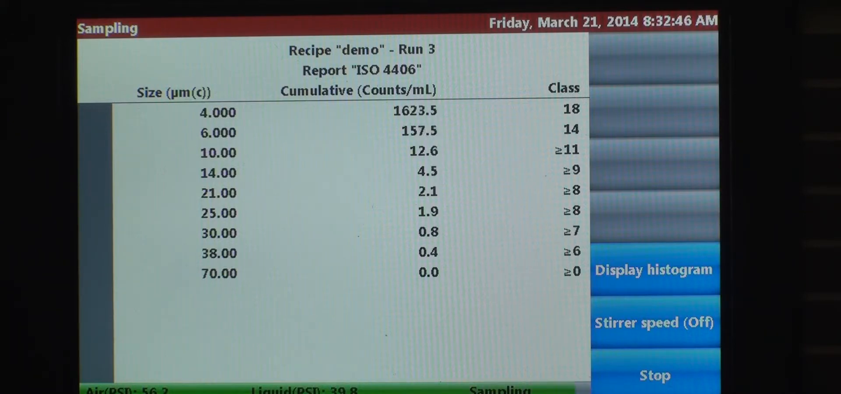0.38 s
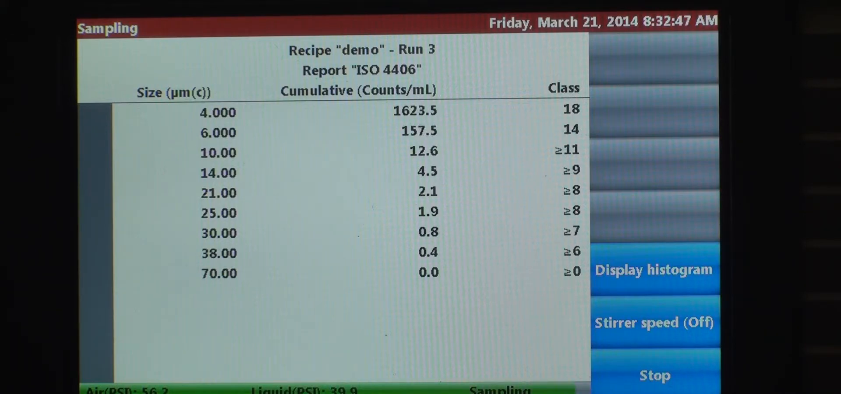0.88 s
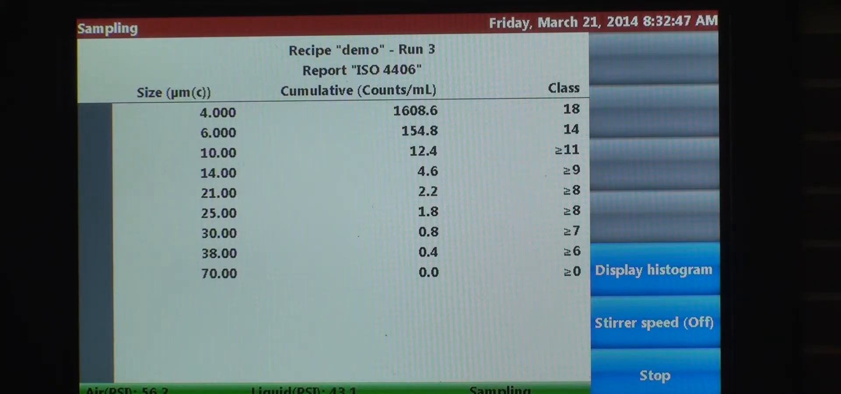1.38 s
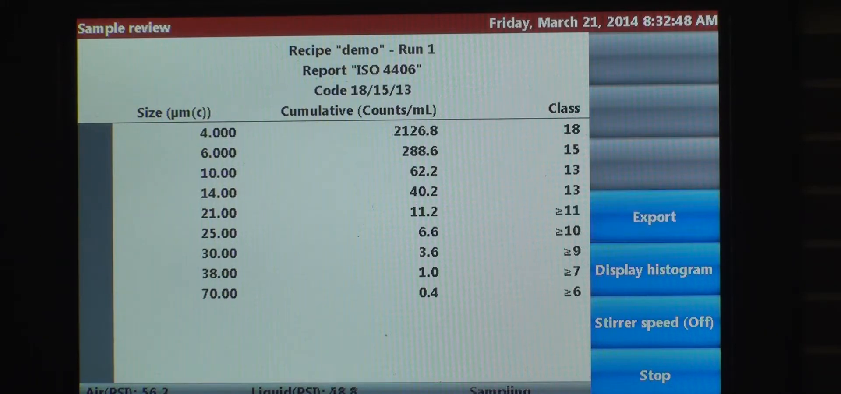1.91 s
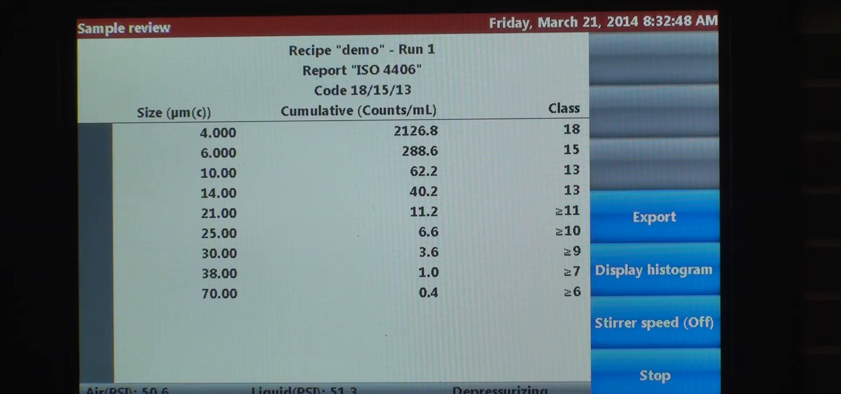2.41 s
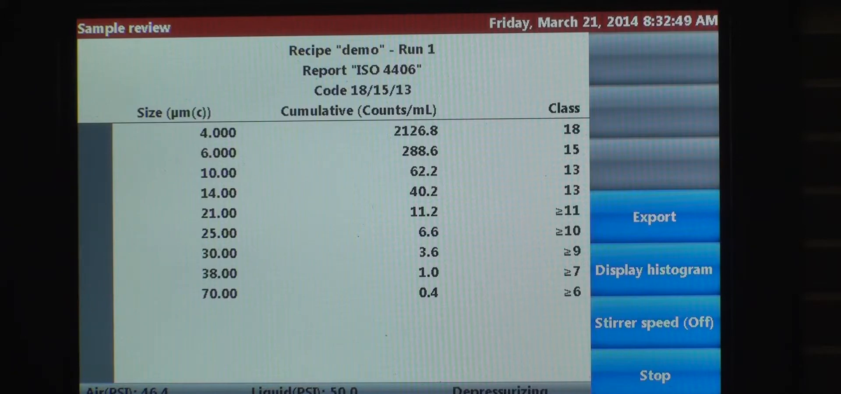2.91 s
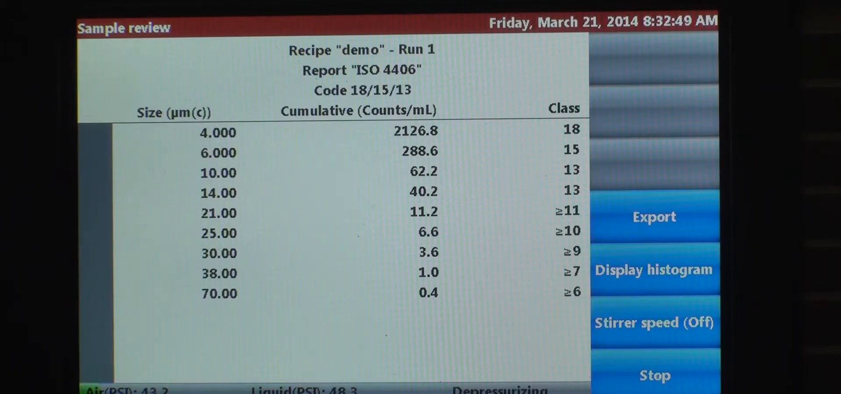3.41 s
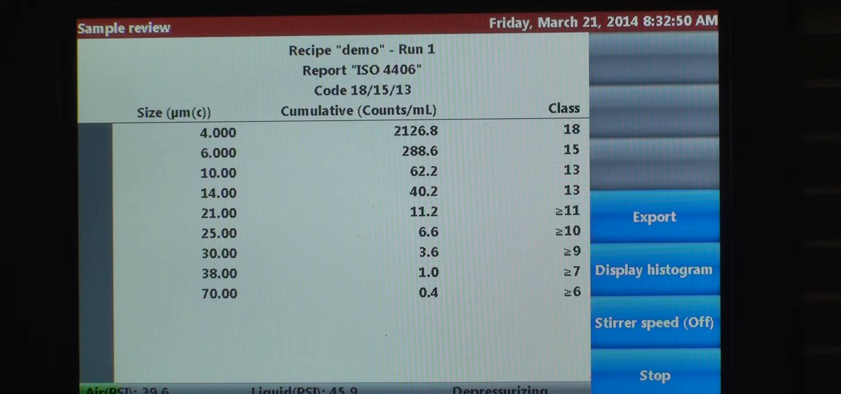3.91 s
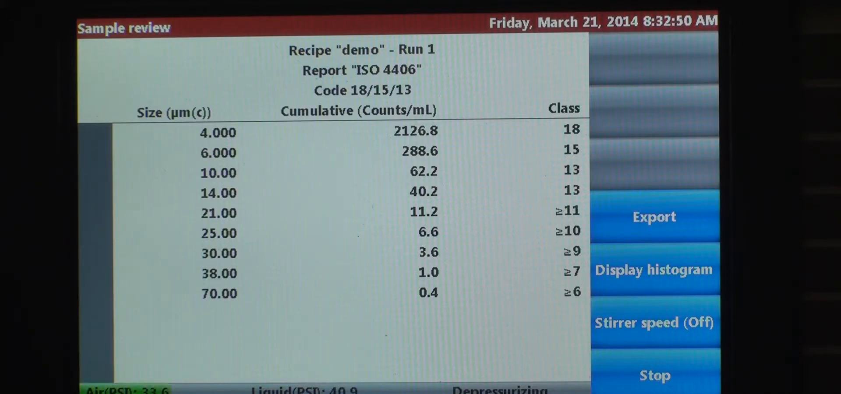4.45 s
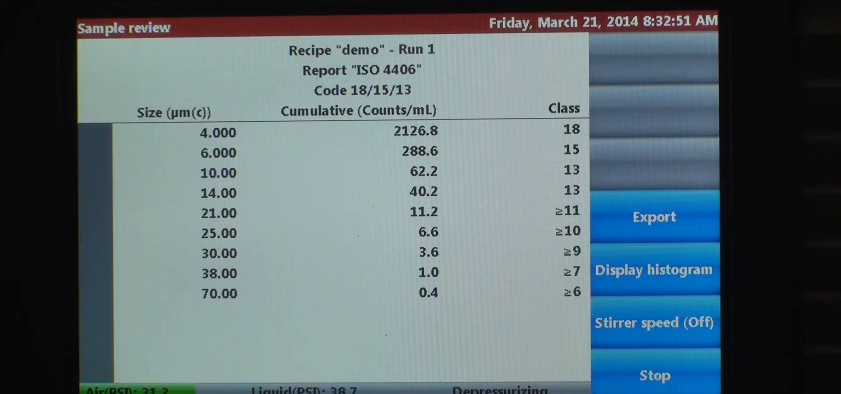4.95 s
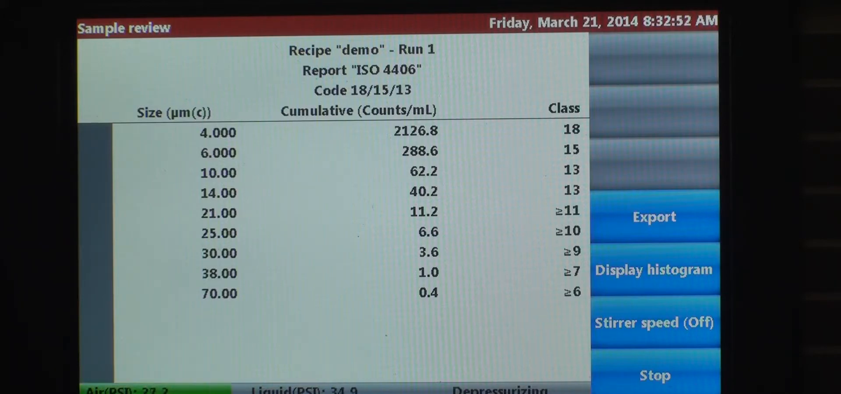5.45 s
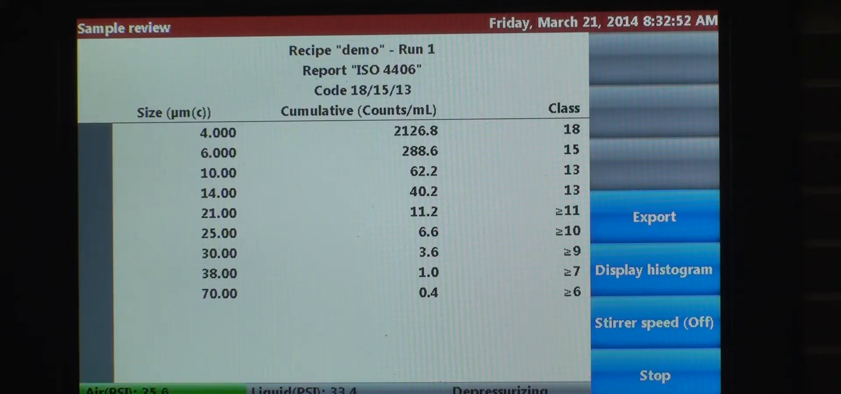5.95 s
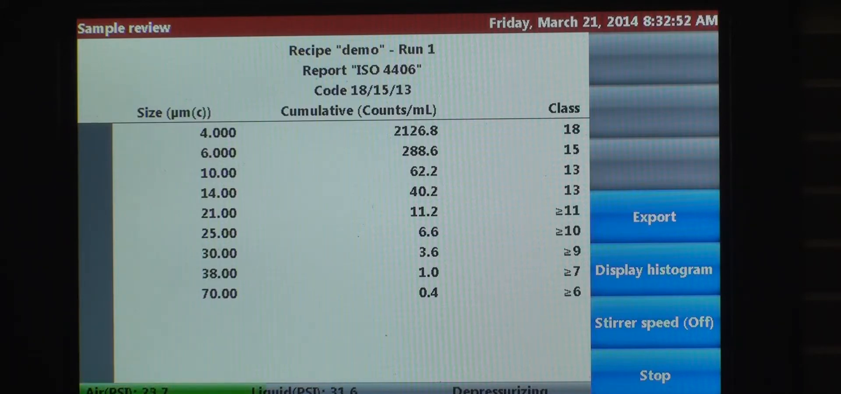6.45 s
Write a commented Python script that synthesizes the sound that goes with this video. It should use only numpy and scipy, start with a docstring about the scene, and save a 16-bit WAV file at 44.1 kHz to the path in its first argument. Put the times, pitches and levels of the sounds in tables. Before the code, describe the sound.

Close to a bench instrument in a quiet laboratory with a faint fan hum, a small pump whirrs low and coasts to a stop. About a second later a valve knocks open with a quick bouncing thump, and compressed air rushes out in a bright hiss. A piercing whistle starts high, swells and flutters, and glides slowly down until the end.

```python
"""Compressed air vents through a narrow port: a hiss of jet noise coloured by the casing, with a whistle that
falls with the pressure, bends towards casing resonances and at times beats with a twin tone. Before it a small
pump in the bench instrument whirrs and stops; a second later a valve thumps open. Recorded close in a quiet
laboratory with a low fan hum, on a microphone with two ports: the right one is nearer to the vent and takes
most of the bass. Two faint seeps of air and a brief creak are heard too."""
import sys
import numpy as np
from scipy import signal
from scipy.fft import rfft, irfft, next_fast_len
from scipy.io import wavfile

SR = 44100
rng = np.random.default_rng(int(sys.argv[2]) if len(sys.argv) > 2 else 0)


def convert_level_to_amplitude(level_db):
    """Map a level in decibels to its linear amplitude factor."""
    exponent = np.asarray(level_db, float) / 20
    return 10 ** exponent


def log_audio(samples):
    """Write samples as a 16-bit WAV file to the path given in sys.argv[1]."""
    # one column per channel
    frames = np.atleast_2d(samples).T
    # limit to full scale, then quantise
    limited = np.clip(frames, -1, 1)
    pcm = np.round(limited * 32767).astype(np.int16)
    wavfile.write(sys.argv[1], SR, pcm)


N = 290663
OPEN_S = 1.697  # the valve opens
EDGE_HZ = 15900  # upper limit of the microphone's band


def evened(x):
    """Scales to rms 1."""
    return x / np.sqrt(np.mean(x ** 2) + 1e-20)


def curve(rows):
    """Columns of a table as curves over time."""
    s, *columns = np.transpose(rows)
    t = np.arange(N) / SR
    return np.array([np.interp(t, s, column) for column in columns])


def read(points, hz):
    """Columns of a table on a log-frequency axis."""
    f, *columns = np.transpose(points)
    return np.array([np.interp(np.log(hz + 1), np.log(f + 1), column) for column in columns])


def shaped(x, gain):
    """Filters by a gain given as a function of Hz."""
    size = 2 * next_fast_len(N // 2 + 1)
    hz = np.fft.rfftfreq(size, 1 / SR)
    return irfft(rfft(x, size) * gain(hz), size)[..., :N]


def causal(gain):
    """Adds the phase that makes a resonant gain ring after the sound, not before."""
    cepstrum = irfft(np.log(gain + 1e-5))
    half = cepstrum.shape[-1] // 2
    start, early, late = cepstrum[..., :1], cepstrum[..., 1:half], cepstrum[..., half:]
    folded = np.concatenate([start, 2 * early, 0 * late], axis=-1)
    return np.exp(rfft(folded))


def wander(hz):
    """Slow chance, rms 1, up to about hz."""
    return evened(shaped(rng.standard_normal(N), lambda f: 1 / (1 + (f / hz) ** 2)))


def bell(f, hz, width, power=2):
    """Resonance curve: 1 at hz, falling to a half at either end of its width."""
    return 1 / (1 + (2 * (f - hz) / width) ** power)


def peaks(rows):
    """Noise in a few resonances, rms 1."""
    def gain(f):
        return sum(convert_level_to_amplitude(db) * bell(f, hz, width) for hz, width, db in rows)
    return evened(shaped(rng.standard_normal(N), gain))


# Level balance of the two microphone ports.
# Each row: frequency in Hz, left minus right in dB.
PORT_BALANCE = [(60, -20.5), (110, -21), (200, -12.5), (380, -4.5), (700, -2.5), (1290, 2), (2380, 3),
                (4400, 2.5), (8120, -3.5), (15000, -15)]


def ports(x):
    """Splits a sound over the two ports with their bass imbalance."""
    def gain(f):
        sides = convert_level_to_amplitude(np.array([[.5], [-.5]]) * read(PORT_BALANCE, f))
        return sides * 2 / sides.sum(0)
    return shaped(x, gain)


def room(x, t60, wet_db):
    """Direct sound plus a decaying tail of sparse taps, other taps at each port; power kept."""
    at = np.arange(60, SR // 2, 20)
    places = at + rng.integers(0, 20, (2, len(at)))
    taps = rng.choice([-1., 1.], (2, len(at))) * convert_level_to_amplitude(-60 * at / SR / t60)
    tail = np.zeros((2, SR // 2 + 20))
    np.put_along_axis(tail, places, taps, 1)
    tail *= convert_level_to_amplitude(wet_db) / np.linalg.norm(tail[0])
    tail[:, 0] = 1  # direct sound
    both = x * np.ones((2, 1))
    return signal.fftconvolve(both, tail, axes=1)[:, :N] / np.sqrt(1 + convert_level_to_amplitude(2 * wet_db))


# Pump shaft slowing to a stop.
# Each row: time in seconds, speed in turns per second, level in dB before the port levels.
PUMP_RUN = [(0, 28.8, -41), (.33, 28.8, -41), (.4, 26, -46), (.47, 22, -48), (.55, 17, -52), (.65, 12, -70)]
# Tones at multiples of the shaft speed.
# Each row: multiple of the shaft speed, relative level in dB.
SHAFT_ORDERS = [(4, -9), (6, -32), (7, -19), (8, 0.5), (9, -4.5), (12, -24.5), (16, -21.5), (24, -24.5),
                (35, -18.5)]
# Mount resonances that the slowing pump shakes.
# Each row: frequency in Hz, width in Hz, relative level in dB.
MOUNT_PEAKS = [(150, 47, -4), (209, 30, 3), (258, 28, -3.5), (377, 60, -12.5)]


def pump():
    """Shaft orders and whirr while it runs; as it coasts down, a rattle in the mount."""
    stroke_turns = .37  # shaft angle of the piston stroke
    speed, level_db = curve(PUMP_RUN)
    turns = np.cumsum(speed) / SR - stroke_turns
    running = np.clip(speed / PUMP_RUN[0][1], 0, 1) ** 30  # drops soon after the speed does
    orders = evened(sum(convert_level_to_amplitude(db) * np.cos(2 * np.pi * k * turns) for k, db in SHAFT_ORDERS))
    whirr = convert_level_to_amplitude(-16.5) * peaks([(500, 3300, 0), (2470, 17000, -8)])
    strokes = 1 + 0.2 * np.cos(2 * np.pi * turns)
    rattle = strokes * peaks(MOUNT_PEAKS)
    x = convert_level_to_amplitude(level_db) * (running * (orders + whirr) + np.sqrt(1 - running ** 2) * rattle)
    turning = level_db > PUMP_RUN[-1][2]
    return x * convert_level_to_amplitude([[-14], [5]]) * turning  # left and right port levels in dB


# Spectrum of the room's air noise.
# Each row: frequency in Hz, relative level in dB per Hz.
AIR_SPECTRUM = [(15, -32), (25, -3.5), (52, -3.5), (92, -19), (130, -11.5), (236, -15.5), (503, -16),
                (714, -18.5), (796, -17), (1070, -20.5), (1890, -23.5), (2280, -27), (16000, -42.5)]
# How alike the air noise is at the two ports.
# Each row: frequency in Hz, left-right likeness from 0 to 1.
LIKENESS = [(40, 0.98), (130, 0.44), (290, 0.072), (3770, 0.39), (15000, 0.26)]
# Fan tones, heard low in the laboratory.
# Each row: frequency in Hz, middle level in dB rms before the port balance.
FAN_TONES = [(29, -62.5), (43, -62.5), (58, -59), (86, -62.5), (118, -65), (172, -68), (204, -72.5)]


def floor():
    """Room air, partly shared by the ports, and wavering fan tones."""
    a, b = rng.standard_normal((2, N))

    def alike(f):
        return np.clip(read(LIKENESS, f)[0], 0, 1)
    shared = shaped(a, alike)
    apart = shaped(b, lambda f: np.sqrt(1 - alike(f) ** 2))
    air = evened(shaped(np.array([shared + apart, a]), lambda f: convert_level_to_amplitude(read(AIR_SPECTRUM, f))))
    t = np.arange(N) / SR
    hum = np.zeros(N)
    for hz, db in FAN_TONES:
        tone = np.sqrt(2) * np.sin(2 * np.pi * hz * t + wander(1))
        hum += convert_level_to_amplitude(db + 2 * wander(2)) * tone
    return ports(convert_level_to_amplitude(-50) * air + hum)


def resonant_noise(levels, resonances):
    """Noise in resonances under a level curve, heard in the room."""
    return room(convert_level_to_amplitude(curve(levels)[0]) * peaks(resonances), t60=0.36, wet_db=-5)


# Thin seep of air while sampling.
# Each row: time in seconds, level in dB rms.
SEEP_LEVELS = [(.38, -97), (.44, -65), (.52, -66.5), (1.26, -67.5), (1.29, -97)]
# Its resonances. Each row: frequency in Hz, width in Hz, relative level in dB.
SEEP_RESONANCES = [(7940, 470, 2), (11000, 2800, -9)]


def seep():
    """A thin leak of air: high resonant noise."""
    return resonant_noise(SEEP_LEVELS, SEEP_RESONANCES)


# Louder seep as the valve starts to lift.
# Each row: time in seconds, level in dB rms.
LIFT_LEVELS = [(1.57, -90), (1.61, -59), (1.7, -67), (1.71, -88)]
# Its resonances. Each row: frequency in Hz, width in Hz, relative level in dB.
LIFT_RESONANCES = [(5470, 1630, 0), (9700, 770, 0)]


def lift():
    """Air leaking past the lifting valve: resonant noise just before the thump."""
    return resonant_noise(LIFT_LEVELS, LIFT_RESONANCES)


# The valve slams open and bounces.
# Each row: start in seconds, level in dB of the ring's peak before room and port balance.
VALVE_KNOCKS = [(1.6965, -30), (1.7, -22), (1.714, -27.5), (1.726, -34)]
# Panel modes that each blow rings.
# Each row: frequency in Hz, relative level in dB, 60 dB decay time in seconds.
PANEL_MODES = [(215, 1, .04), (380, -3, .022), (530, 2, .022), (640, -4, .02), (780, -6, .02)]


def knocks():
    """Each blow rings the panel modes and rattles briefly."""
    out = np.zeros(N)
    t = np.arange(SR // 5) / SR
    ring = sum(convert_level_to_amplitude(db - 60 * t / t60) * np.sin(2 * np.pi * hz * t) for hz, db, t60 in PANEL_MODES)
    ring = ring / abs(ring).max()
    band = signal.butter(2, [250, 900], "band", fs=SR, output="sos")
    rattle_gain = convert_level_to_amplitude(-9.5 - 60 * t / 0.083)
    for start_s, db in VALVE_KNOCKS:
        rattle = evened(signal.sosfilt(band, rng.standard_normal(len(t))))
        out[round(start_s * SR):][:len(t)] += convert_level_to_amplitude(db) * (ring + rattle_gain * rattle)
    return ports(room(out, t60=0.25, wet_db=-4))


# Broad colour of the hiss at each port.
# Each row: frequency in Hz, left and right relative level in dB.
HISS_COLOUR = [(704, -27.5, -20.5), (1380, -23.5, -11), (2360, -26, -21), (4000, -26, -21.5),
               (4650, -25, -16.5), (5440, -25, -17.5), (6440, -16, -6.5), (7760, -16, -13.5),
               (7500, -19, -14.5), (10480, -24, -23.5), (12300, -24, -17.5), (13400, -40, -36.5),
               (14830, -38, -19), (15900, -42, -34)]
# Narrow resonances of casing and tubing.
# Each row: frequency in Hz, width in Hz, left boost in dB, right boost in dB.
CASING_RINGS = [(1669, 80, 6.0, 6.4), (1787, 80, 0.4, 5.0), (3058, 200, 9.4, 7.8), (3208, 50, 1.6, 5.2),
                (4360, 130, 4.9, 3.3), (4490, 50, 4.7, 3.9), (4662, 80, 6.3, 4.5), (4748, 50, 4.7, 4.7),
                (6406, 80, 5.1, 2.0), (6557, 80, 8.3, 9.4), (7052, 80, 4.7, 4.9), (7214, 80, 1.6, 8.8),
                (7526, 50, 5.0, 11.1), (7666, 50, 6.5, 7.2), (7806, 50, 4.0, 4.9), (8398, 80, 9.8, 13.8),
                (8484, 80, 1.8, 4.6), (8699, 50, 9.2, 10.4), (9227, 130, 4.4, 4.6), (9550, 80, 7.1, 5.8),
                (9722, 130, 7.3, 8.4), (9862, 80, 2.5, 3.9), (10541, 130, 4.4, 0.9), (10950, 320, 6.7, 0.6),
                (11262, 80, 7.4, 2.8), (12177, 50, 2.4, 5.8), (12339, 50, 3.2, 4.7)]


def hiss():
    """Turbulent jet noise, brighter while the pressure is high, ringing the casing."""
    late_db, surge_db, drain_s = -34, 3, 2.05  # before colouring: the jet starts high and sags
    rise_s = .005
    t = np.arange(N) / SR - OPEN_S
    above_db = surge_db * np.exp(-np.maximum(t, 0) / drain_s)
    flutter_db = 1.0 * wander(50) + 1.0 * wander(320) + 0.39 * wander(6)
    noise = rng.standard_normal(N) * convert_level_to_amplitude(flutter_db)
    bright = shaped(noise, lambda f: f ** 2 / (f ** 2 + 4820.0 ** 2))
    opening = np.clip(t / rise_s, 0, 1) ** 2
    jet = convert_level_to_amplitude(late_db + above_db) * (noise + convert_level_to_amplitude(2.35 * above_db) * bright) * opening

    def colour(f):
        rings_db = sum(np.array([[left], [right]]) * bell(f, hz, width)
                       for hz, width, left, right in CASING_RINGS)
        low_cut = f ** 2 / (f ** 2 + 700.0 ** 2)
        return causal(convert_level_to_amplitude(read(HISS_COLOUR, f) + rings_db + 12.5) * low_cut)
    return shaped(room(jet, t60=0.34, wet_db=1.0), colour)


# Whistle pitch, snapping up as the valve opens and falling as the pressure drains.
# Each row: time in seconds, pitch in Hz before steps and wander.
WHISTLE_PITCH = [(1.697, 7400), (1.712, 8620), (1.73, 8731), (1.77, 8754), (1.83, 8741), (1.9, 8683),
                 (2.0, 8583), (2.06, 8462), (2.3, 8119), (2.66, 7708), (2.9, 7465), (3.62, 6826),
                 (4.34, 6241), (4.7, 5936), (5.2, 5596), (5.7, 5275), (6.59, 4725)]
# Drive of the whistle between resonances.
# Each row: time in seconds, level in dB before swells and the left port's loss.
WHISTLE_DRIVE = [(1.697, -47), (1.708, -22.5), (1.74, -31.5), (1.78, -28.5), (1.83, -29.5), (2.4, -22.5),
                 (3.3, -22.5), (4.1, -29), (4.8, -32.5), (5.5, -40), (6.0, -53.5), (6.6, -36)]
# Colour that the upper harmonics meet on the way down.
# Each row: frequency in Hz, left level in dB, right level in dB, before flutter.
HARMONIC_COLOUR = [(9500, -47, -50), (9830, -45, -38.5), (10130, -55, -47), (10550, -41, -47),
                   (11350, -41.5, -43.5), (11360, -56, -44.5), (13000, -58, -52), (14100, -60, -52),
                   (14900, -50, -38), (15700, -61, -42), (16300, -66, -50)]
# Casing resonances on which the falling tone lingers and swells. # Each row: frequency in Hz, width in Hz, left
# swell in dB, right swell in dB.
CASING_LOCKS = [(4800, 115, 2, 4), (4971, 170, -2, 6), (5700, 33, 3.4, 5), (5730, 51, 1, 4.5),
                (5910, 149, 6, 9.5), (6095, 124, 2, 13), (6273, 152, 12, 11.5), (6428, 136, 10.5, 12.5),
                (6575, 168, 14.5, 15), (6690, 75, 10, 5), (6780, 103, 0.0, 7.9), (6926, 124, -1, 4),
                (7008, 130, 7.8, 6.5), (7194, 63, -1, 5.7), (7264, 44, 3.6, 4.5), (7527, 87, 7, 13),
                (7700, 140, 6, 7.5), (7865, 100, 7.5, 6), (8206, 105, 6.0, 5), (8335, 114, 10.7, 10.3),
                (8462, 142, 16, 13), (8699, 120, 21, 13)]


def whistle():
    """An edge tone that glides down in small steps, with a noisy skirt and at times a beating twin."""
    left_db = -8  # the left port is farther from the vent
    roughness, steadying = 0.61, 0.53  # unsteadiness of the free tone 0-1; dB it loses per dB of swell
    calm_hz, calm_span_hz = 6300, 500  # below this pitch, at low pressure, the tone thins to a clean line
    twin_hz = 78.6  # mean spacing of the second tone, just above the first
    twin_at_hz, twin_span_hz, twin_share = 8340, 126.4, 0.757  # pitch range where it beats

    pitch = curve(WHISTLE_PITCH)[0]
    swell_db = sum(np.array([[left], [right]]) * bell(pitch, hz, width, power=4)
                   for hz, width, left, right in CASING_LOCKS)
    calm = np.clip((calm_hz - pitch) / calm_span_hz, 0, 1)
    rough = roughness * convert_level_to_amplitude(-steadying * swell_db.mean(0) - 9 * calm)

    twin = twin_share * np.exp(-((pitch - twin_at_hz) / twin_span_hz) ** 4)
    glide = pitch - .5 * twin * twin_hz  # the main tone drops by up to half the spacing, so the pair straddles the pitch curve
    pull = sum((lock - glide) * np.exp(-((lock - glide) / 45) ** 2) for lock, *_ in CASING_LOCKS)
    hz = glide + .8 * (1 - .7 * calm) * pull + 10 * wander(25)
    port_turns = 6e-5 * (glide - 5500) * np.array([[1], [0]])  # the ports differ in phase with pitch
    turns = np.cumsum(hz) / SR + port_turns

    beat = twin * np.exp(2j * np.pi * np.cumsum(twin_hz + 8 * wander(11)) / SR)
    noise = wander(84) + 1j * wander(146)
    skirt = (1 + beat + rough * noise) / np.sqrt(1 + twin ** 2 + 2 * rough ** 2)
    falter_db = 3 * calm * wander(24)  # at low pressure the tone falters
    level_db = curve(WHISTLE_DRIVE) + [[left_db], [0]] + swell_db + falter_db
    tone = convert_level_to_amplitude(level_db) * (skirt * np.exp(2j * np.pi * turns)).real

    octave = convert_level_to_amplitude(read(HARMONIC_COLOUR, 2 * pitch)) * np.cos(4 * np.pi * turns)
    third = convert_level_to_amplitude(read(HARMONIC_COLOUR, 3 * pitch) - 15) * np.cos(6 * np.pi * turns) * (3 * hz < EDGE_HZ)
    flutter = convert_level_to_amplitude(2.6 * wander(11) + 3.3 * wander(150) - 1)
    on = np.arange(N) / SR > WHISTLE_DRIVE[0][0]
    return room(np.sqrt(2) * on * (tone + flutter * (octave + third)), t60=1.0, wet_db=-8)


# A brief creak during the venting.
# Each row: time in seconds, level in dB rms.
CREAK_LEVELS = [(4.466, -90), (4.473, -47), (4.505, -45), (4.525, -58), (4.545, -95)]
# Its resonances. Each row: frequency in Hz, width in Hz, relative level in dB.
CREAK_RESONANCES = [(810, 110, 0), (1650, 300, -10), (2330, 300, -8)]


def creak():
    """A short burst of noise in lower resonances."""
    return resonant_noise(CREAK_LEVELS, CREAK_RESONANCES)


def scene():
    """All sources at the two microphone ports."""
    return pump() + floor() + seep() + lift() + knocks() + hiss() + whistle() + creak()


def low_pass(x):
    """Removes everything above the highest recorded frequency."""
    return signal.sosfilt(signal.butter(12, 16730, fs=SR, output="sos"), x)


def record(dry):
    """Limits the band steeply at its upper edge and finishes the mix."""
    limited = shaped(dry, lambda f: 1 / (1 + (f / EDGE_HZ) ** 400))
    return low_pass(limited)


dry = scene()
out = record(dry)
log_audio(out)
```